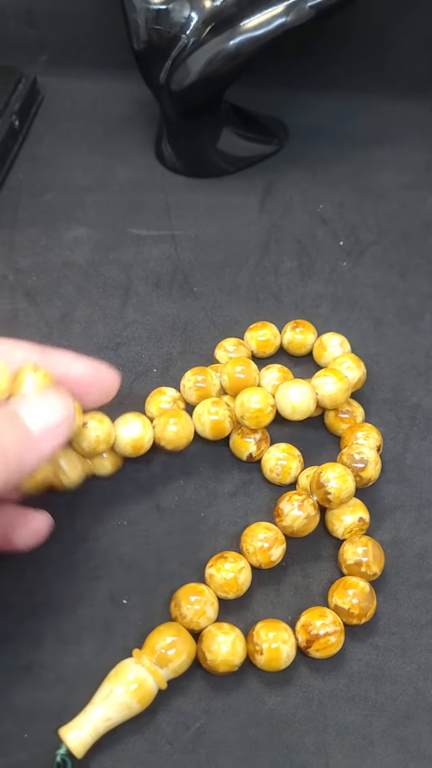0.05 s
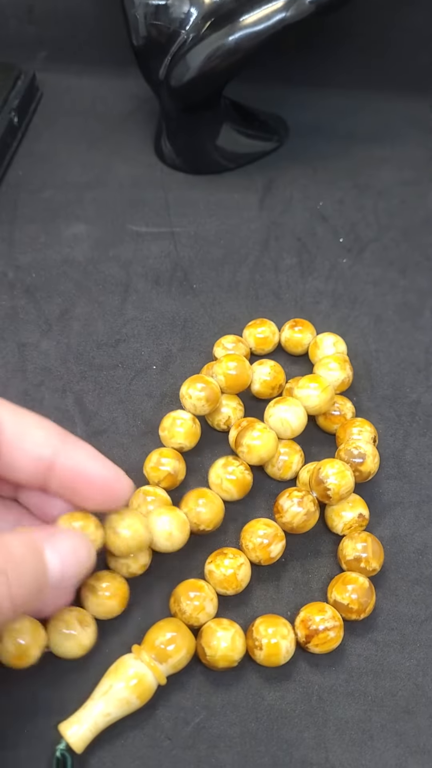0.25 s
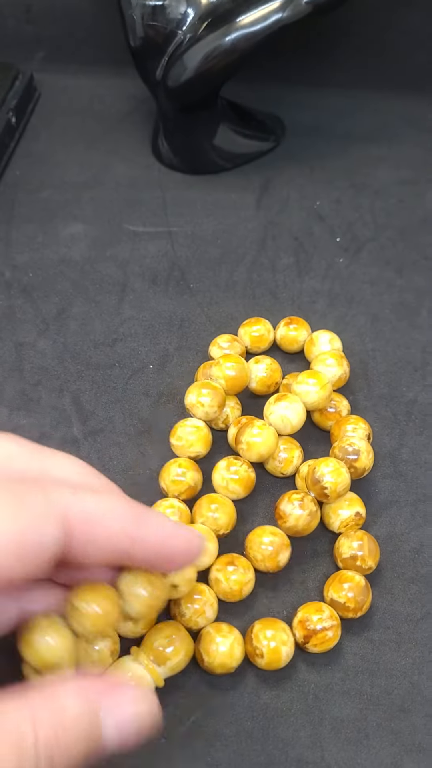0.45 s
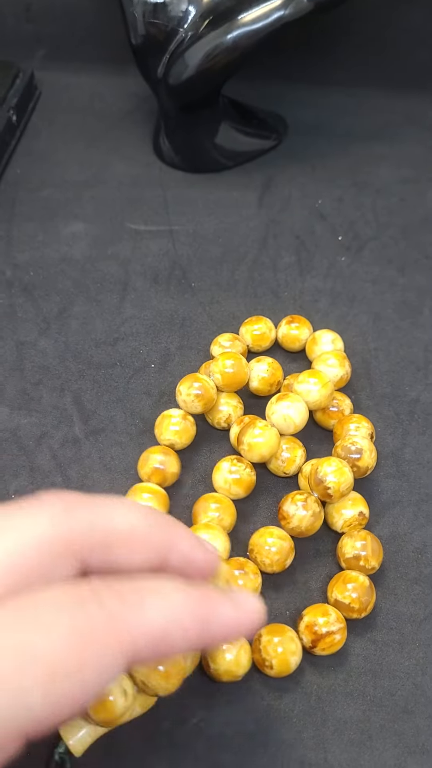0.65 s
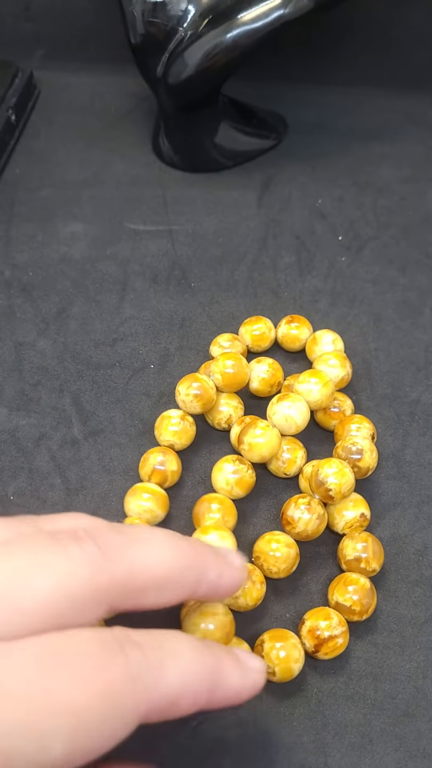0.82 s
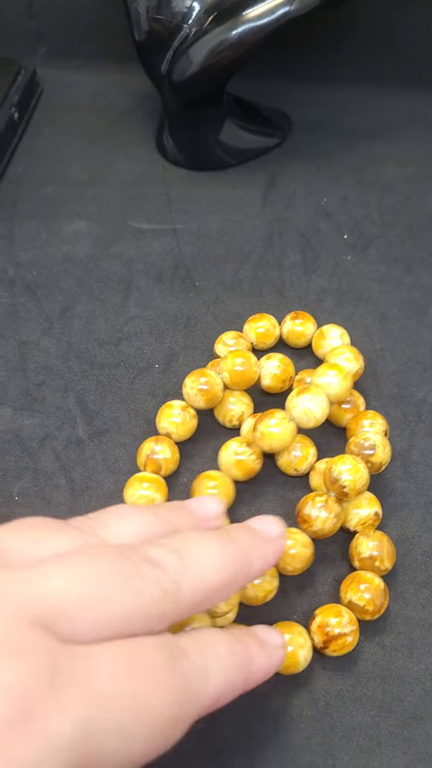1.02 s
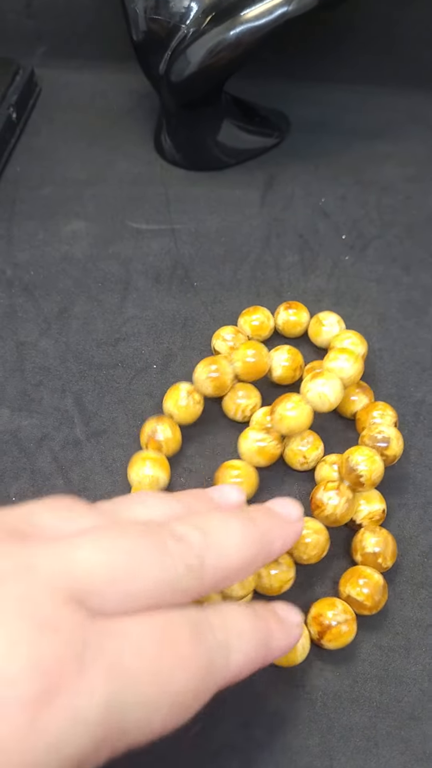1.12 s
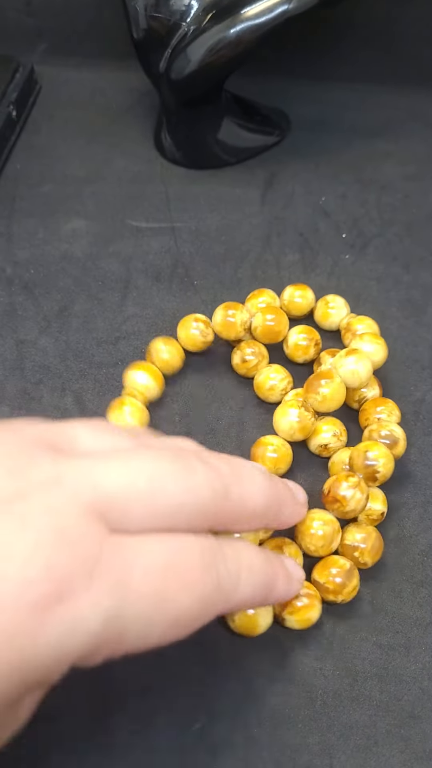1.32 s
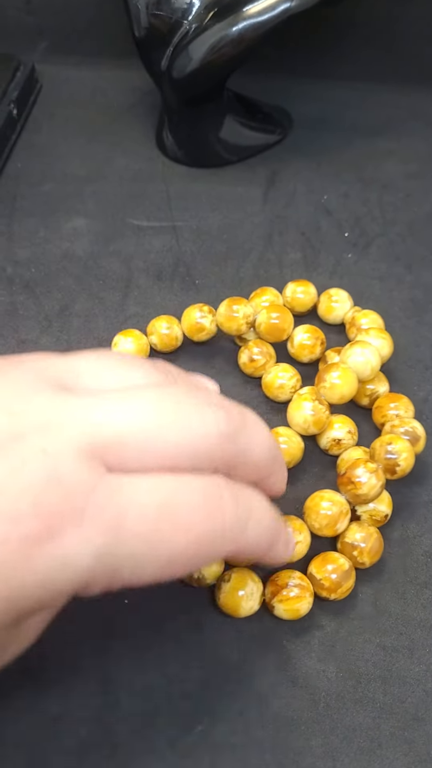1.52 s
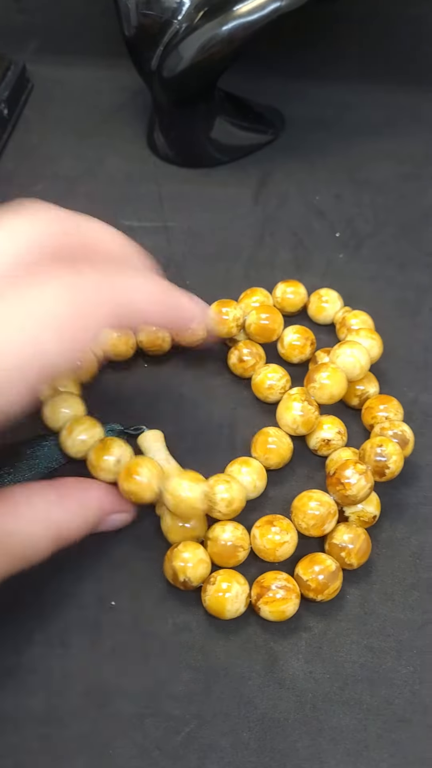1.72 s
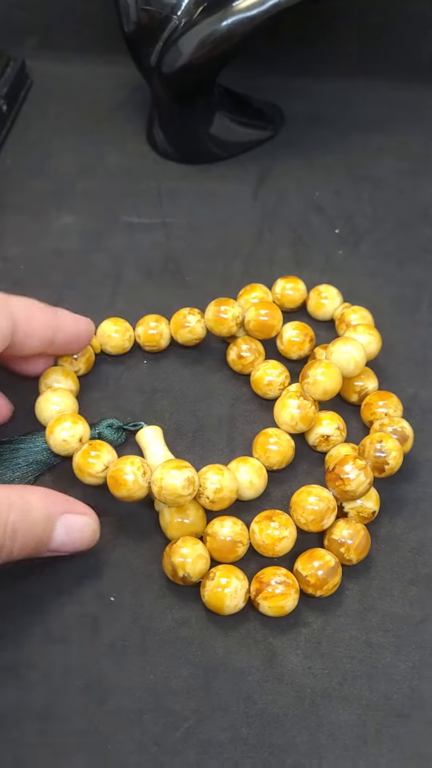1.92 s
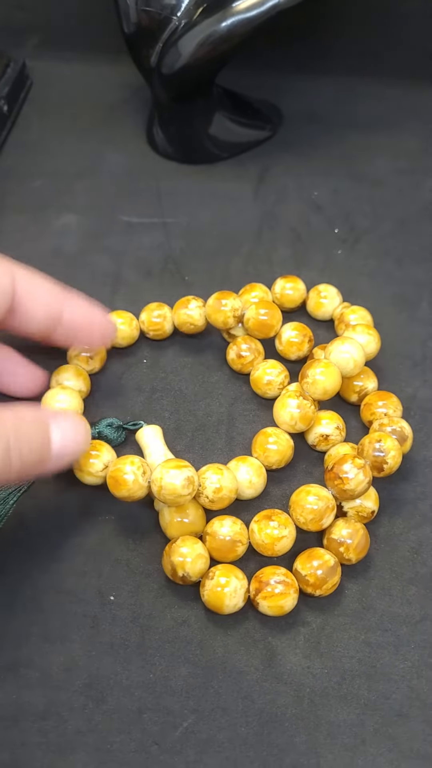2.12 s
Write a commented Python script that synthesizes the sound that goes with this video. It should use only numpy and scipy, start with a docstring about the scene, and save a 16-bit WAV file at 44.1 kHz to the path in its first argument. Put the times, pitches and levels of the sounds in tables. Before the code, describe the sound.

A string of hard beads clacks, rubs and thuds softly on a cloth-covered table top

```python
"""Faint hiss and rumble over cloth, then hard resin beads clicking together and knocking a table top.
A string of beads is pushed about by hand on a cloth-covered table, just under a phone, in a quiet room.
Clicks are short sine ticks with noise scatter; knocks and heel bumps are decaying table modes.
Strokes are shaped noise, the finger drag is noise in narrow bands, the rumble is random bumps
through the table modes, and the room tone is coloured noise."""
import sys
import numpy as np
from scipy import signal
from scipy.fft import rfft, irfft
from scipy.io import wavfile
from scipy.ndimage import uniform_filter1d

SR = 44100
rng = np.random.default_rng(int(sys.argv[2]) if len(sys.argv) > 2 else 0)


def int16_out(signal):
    """Quantize to a 16-bit WAV file."""
    q = np.round(np.clip(np.atleast_2d(signal).T, -1, 1) * 32767)
    wavfile.write(sys.argv[1], SR, q.astype(np.int16))


def ratio_of_db(decibels):
    """Turn decibels (scalar or array-like) into linear amplitude factors; 0 dB maps to 1."""
    return 10 ** (np.asarray(decibels, float) / 20)


N = 94815

# Modes of the table top. Each row: frequency in Hz, level in dB, t60 in seconds.
TABLE_MODES = [(66.6, -2, 0.071), (106.3, -4, 0.093), (167.5, -3, 0.094), (211.7, -6.5, 0.067),
               (271.2, -3.5, 0.055), (366.3, -2.5, 0.039), (410.3, -7, 0.051), (475.8, -12.5, 0.12),
               (664, -5.5, 0.066), (740.6, -6, 0.025), (798.5, -12, 0.062), (881, -13.5, 0.089),
               (1198, -10.5, 0.025), (1462, -25, 0.085)]
# Frequencies in Hz at which the deep, body and upper levels hold.
GROUP_CENTRES_HZ = (109, 227.6, 750)


def colour(x, points):
    """Filter by gain points (Hz, dB), interpolated over log frequency."""
    n = x.shape[-1]
    hz, db = np.array(points, float).T
    bin_hz = np.maximum(np.arange(n // 2 + 1) * SR / n, 1)
    gain = ratio_of_db(np.interp(np.log(bin_hz), np.log(hz), db))
    return irfft(rfft(x) * gain, n)


def unit(x):
    """Scale to rms 1."""
    return x / np.sqrt(np.mean(x ** 2))


def walk(rate_hz):
    """Random levels held 1 / rate_hz seconds, smoothed twice, at rms 1."""
    hold = int(SR / rate_hz)
    steps = np.repeat(rng.standard_normal(N // hold + 1), hold)
    smooth = uniform_filter1d(uniform_filter1d(steps, hold), hold)
    return unit(smooth[:N])


def air():
    """Stereo noise: shared bass, unrelated treble."""
    noise = rng.standard_normal((3, N))
    alike_sos = signal.butter(1, 394, fs=SR, output="sos")
    shared_bass = signal.sosfilt(alike_sos, noise[2])
    own_treble = noise[:2] - signal.sosfilt(alike_sos, noise[:2])
    return shared_bass + own_treble


def add(out, x, start_s):
    """Mix x into out at start_s."""
    i = int(start_s * SR)
    out[:, i:i + x.shape[1]] += x[:, :N - i]


def room_tone():
    """Steady coloured noise of the quiet room."""
    # Each row: frequency in Hz, relative gain in dB.
    room_points = [(25, -29.5), (60, -5.5), (260, 3.5), (600, -40), (1500, -25.5), (7000, -27),
                   (16000, -31)]
    return ratio_of_db(-72) * unit(colour(air(), room_points))


def strokes():
    """Cloth fibres hiss under each stroke, each with its own extra treble; the level flickers."""
    # Each row: start in seconds, length in seconds, hiss level in dB, extra top in dB.
    stroke_rows = [(0, 0.052, -62.5, 19), (0.088, 0.039, -62, 18), (0.155, 0.4, -73, 13),
                   (0.91, 0.054, -70, 12), (0.988, 0.053, -64, 13), (1.063, 0.12, -53, 14.5),
                   (1.202, 0.12, -49, 15), (1.361, 0.087, -50, 17), (1.483, 0.051, -59, 12),
                   (1.536, 0.047, -71.5, 14.5), (1.749, 0.033, -75.5, 20), (1.819, 0.056, -59, 12.5),
                   (1.898, 0.012, -65, 8), (1.962, 0.004, -59, 16), (2.005, 0.069, -62, 19)]
    # Each row: frequency in Hz, relative gain in dB.
    hiss_points = [(500, -6), (800, -2.5), (1400, -5.5), (2200, -17), (4400, -1), (8400, -27.5),
                   (16000, -27)]
    attack_s, release_s = 0.02, 0.016
    top_from_hz, flicker_db, flicker_rate_hz = 9810, 2, 60.1
    t = np.arange(N) / SR
    hiss = unit(colour(air(), hiss_points))
    top = signal.sosfilt(signal.butter(2, top_from_hz, "high", fs=SR, output="sos"), hiss)
    out = 0
    for start_s, length_s, hiss_db, top_db in stroke_rows:
        env = 1 / (1 + np.exp(np.clip(2 * (start_s - t) / attack_s, -50, 50)))
        env = env * np.exp(-np.maximum(t - start_s - length_s, 0) / release_s)
        out = out + env * ratio_of_db(hiss_db) * (hiss + top * (ratio_of_db(top_db) - 1))
    return out * ratio_of_db(flicker_db * walk(flicker_rate_hz))


def drag():
    """A finger drags over the cloth: rubbing noise held in narrow resonances."""
    # Each row: centre in Hz, width in Hz, level in dB.
    drag_bands = [(241.2, 30.4, 0.5), (493, 140, -11.5), (725, 27, -11.5)]
    start_s, attack_s, hold_s = 1.985, 0.0057, 0.055
    level_db, fade_db_per_s = -50.5, 166
    t = np.arange(N) / SR - start_s
    noise = air()
    fade_db = fade_db_per_s * np.maximum(t - hold_s, 0)
    env = np.clip(t / attack_s, 0, 1) * ratio_of_db(level_db - fade_db)
    rub = 0
    for hz, width_hz, db in drag_bands:
        edges_hz = [hz - width_hz / 2, hz + width_hz / 2]
        sos = signal.butter(2, edges_hz, "band", fs=SR, output="sos")
        rub = rub + ratio_of_db(db) * unit(signal.sosfilt(sos, noise))
    return env * rub


def ring(t, hz, db, t60_s, lean=0):
    """Modes after one push at t = 0, deep ones swelling slower; the right port hears low modes late."""
    rise_cycles, right_late_s, late_below_hz = 0.54, 0.00054, 920
    bass_left_db, bass_below_hz = 5, 270  # the left port hears more of the deep modes
    lean_db = 3.5  # spread of left-right balance of the higher modes
    hz = hz[:, None]
    side = np.array([0, 1])[:, None, None]  # left, right
    late_s = side * right_late_s / (1 + (hz / late_below_hz) ** 2)
    t = np.maximum(t - late_s, 0)
    deep = 1 / (1 + (hz / bass_below_hz) ** 4)
    pan_db = (0.5 - side) * (bass_left_db * deep + lean_db * lean * (1 - deep))
    gain = ratio_of_db(db[:, None] + pan_db - 60 * t / t60_s[:, None])
    rise = 1 - np.exp(-t * hz / rise_cycles)
    return (gain * np.sin(2 * np.pi * hz * t) * rise).sum(axis=1)


def slide():
    """Small uneven bumps under the dragged beads rumble through the table modes."""
    # Weight of the beads on the table. Each row: time in seconds, rumble level in dB.
    rumble_points = [(0, -57.5), (.21, -62.5), (.35, -50.5), (.42, -56), (.7, -61), (.82, -67.5),
                     (1.05, -60.5), (1.22, -50), (1.5, -52.5), (1.6, -68.5), (1.64, -73), (1.76, -67.5),
                     (1.9, -59), (2.15, -66.5)]
    # Relative levels in dB of the deep, body and upper modes.
    rumble_group_db = (-0.5, -3, -6)
    bumps_per_s, bump_spread_db = 2000, 2
    rumble_db = np.interp(np.arange(N) / SR, *np.array(rumble_points).T)
    hits = rng.random(N) < bumps_per_s / SR
    strength = ratio_of_db(bump_spread_db * rng.exponential(size=N))
    bumps = hits * strength * rng.standard_normal(N)
    hz, db, t60_s = np.array(TABLE_MODES).T
    group_db = np.interp(np.log(hz), np.log(GROUP_CENTRES_HZ), rumble_group_db)
    body = ring(np.arange(7000) / SR, hz, db + group_db, t60_s)
    body = body / np.sqrt((body ** 2).sum(axis=1).mean())  # unit energy
    return signal.fftconvolve((unit(bumps) * ratio_of_db(rumble_db))[None], body)[:, :N]


def thumps():
    """The heel of the hand bumps the table: one dull mode each."""
    # Each row: start in seconds, level in dB, frequency in Hz.
    thump_rows = [(1.553, -40.5, 125), (1.8522, -20.5, 131), (1.8703, -22, 124), (1.894, -32, 135)]
    t60_s = 0.05
    out, t = np.zeros((2, N)), np.arange(7000) / SR
    for start_s, db, hz in thump_rows:
        add(out, ring(t, np.array([hz]), np.array([db]), np.array([t60_s])), start_s)
    return out


def knocks():
    """Beads and fingers land on the table: the same modes ring, each landing in its own mix."""
    # Each row: start in seconds, body level in dB, deep level in dB, upper level in dB.
    knock_rows = [(0.082, -42.5, -42, -63), (0.2324, -17.5, -73, -27), (.2440, -22.5, -42, -35),
                  (0.256, -25, -47, -43), (0.2612, -11, -58, -23), (0.274, -20.5, -35, -27),
                  (0.3015, -22, -33.5, -18), (0.435, -68, -42, -59), (.453, -42.5, -58, -35.5),
                  (0.586, -44.5, -36.5, -44.5), (0.622, -28, -33.5, -31), (.638, -42, -53, -41),
                  (0.746, -94, -87, -48), (0.839, -55, -71, -51), (0.901, -42, -52, -44.5),
                  (.944, -43, -88, -32), (1.167, -40, -94, -40), (1.278, -43, -41, -30),
                  (1.2985, -38, -83, -17.5), (1.3048, -19.5, -43, -45), (1.322, -42, -28, -36),
                  (1.405, -25.5, -69, -59), (1.419, -42, -36, -76), (1.433, -23.5, -86, -43.5),
                  (1.447, -60, -66, -44), (1.454, -37, -40, -72), (1.529, -28, -69, -63),
                  (1.665, -36.5, -62, -64.5), (1.789, -38, -62, -57), (1.819, -36.5, -31, -42),
                  (1.838, -46, -55, -37.5), (1.938, -41, -31.5, -84), (1.990, -36.5, -35.5, -63)]
    detune, spot_db = 0.013, 1.5  # spreads of relative mode pitch and of mode level
    out, t = np.zeros((2, N)), np.arange(7000) / SR
    hz, db, t60_s = np.array(TABLE_MODES).T
    for start_s, body_db, deep_db, upper_db in knock_rows:
        pitch, level, lean = rng.standard_normal((3, len(hz)))
        push_db = np.interp(np.log(hz), np.log(GROUP_CENTRES_HZ), [deep_db, body_db, upper_db])
        mode_db = db + push_db + spot_db * level
        add(out, -ring(t, hz * (1 + detune * pitch), mode_db, t60_s, lean[:, None]), start_s)
    return out


def clicks():
    """Bead on bead: tick, short ring, scatter off neighbour beads, hand and table, duller room tail."""
    # Each row: start in seconds, level in dB, tick pitch in Hz.
    click_rows = [(0.1092, -41.5, 6850), (0.125, -44, 4400), (0.2373, -37.5, 9740), (0.252, -44, 5430),
                  (0.263, -31.5, 4630), (0.3006, -30.5, 10270), (0.4324, -38, 4960), (.4522, -40, 6530),
                  (0.471, -48, 4540), (0.5854, -36.5, 6580), (0.6202, -27.5, 9080), (0.746, -45.5, 6720),
                  (0.9442, -42, 7190), (1.1486, -34.5, 4420), (1.1662, -40.5, 3360), (1.2767, -33.5, 8240),
                  (1.2983, -23, 6260), (1.4465, -29, 4200), (1.523, -47.5, 4460)]
    # Each row: frequency in Hz, relative gain in dB.
    click_points = [(1200, -2), (1900, -7), (3200, -7.5), (3900, 0), (8800, -5), (11000, -13),
                    (16000, -11.5)]
    tick_cycles = 2.2  # whole length of the tick
    ring_db, ring_t60_s = -14.5, 0.017
    scatter_db, scatter_rise_s, scatter_hold_s, scatter_t60_s = -8.5, 0.00075, 0.0036, 0.043
    tail_db, tail_t60_s, tail_top_hz = -25.5, 0.21, 5300
    tint_width_oct, tint_db = 0.18, 10  # scatter is stronger about the tick pitch
    patchy_db = 4  # spread of the uneven resonances
    out, t = np.zeros((2, N)), np.arange(6144) / SR
    near = ratio_of_db(scatter_db - 60 * np.maximum(t - scatter_hold_s, 0) / scatter_t60_s)
    near = near * np.minimum(t / scatter_rise_s, 1)
    far = ratio_of_db(tail_db - 60 * t / tail_t60_s) * np.minimum(t / scatter_hold_s, 1)
    tail_filter = signal.butter(1, tail_top_hz, fs=SR)
    for start_s, db, hz in click_rows:
        tint = [(hz / 2 ** tint_width_oct, 0), (hz, tint_db), (hz * 2 ** tint_width_oct, 0)]
        patchy = np.c_[np.linspace(1500, 16000, 60), patchy_db * rng.standard_normal(60)]
        noise = colour(rng.standard_normal((2, len(t))), click_points)
        noise = unit(colour(noise, patchy))
        scatter = unit(colour(noise, tint)) * near
        tail = signal.lfilter(*tail_filter, noise) * far
        tick_env = np.sin(np.pi * np.minimum(t * hz / tick_cycles, 1)) ** 2
        ring_env = ratio_of_db(ring_db - 60 * t / ring_t60_s)
        tone = (tick_env + ring_env) * np.sin(2 * np.pi * hz * t)
        add(out, (tone + scatter + tail) * ratio_of_db(db), start_s)
    return out


def scene():
    """Room tone, hand, table and beads."""
    return room_tone() + strokes() + drag() + slide() + thumps() + knocks() + clicks()


def band_limit(x):
    """A steep low-pass at the top of the band."""
    return signal.sosfilt(signal.butter(12, 16660, fs=SR, output="sos"), x)


def record(dry):
    """The phone cuts deep bass and the top; its left port faces the beads and is brighter."""
    bright_hz, bright_width_hz = 9500, 6000
    low_cut_hz, top_hz = 60.3, 15800
    lift = signal.lfilter(*signal.iirpeak(bright_hz, bright_hz / bright_width_hz, SR), dry[0])
    mix = np.array([dry[0] + lift, dry[1]])
    mix = signal.sosfilt(signal.butter(2, low_cut_hz, "high", fs=SR, output="sos"), mix)
    mix = signal.sosfilt(signal.ellip(8, 0.2, 40, top_hz, fs=SR, output="sos"), mix)
    return band_limit(mix)


dry = scene()
out = record(dry)
int16_out(out)
```